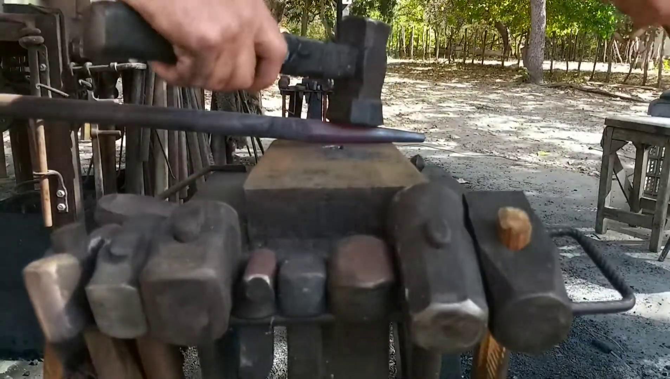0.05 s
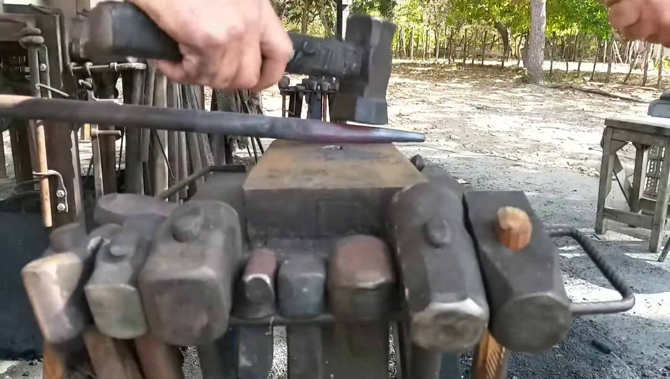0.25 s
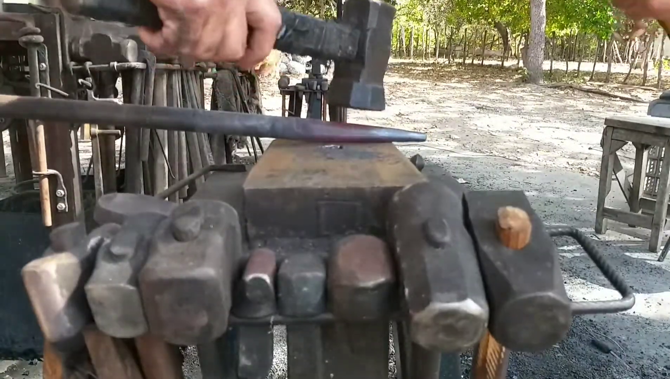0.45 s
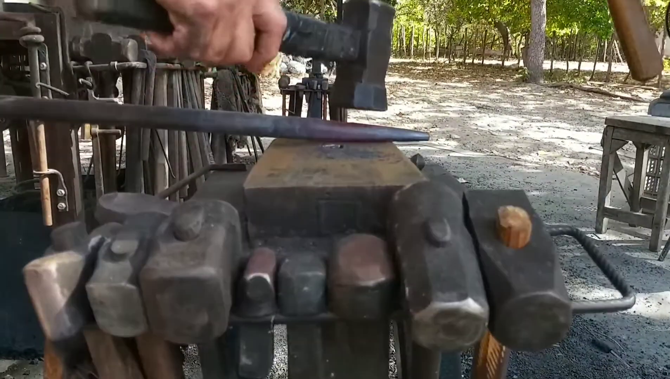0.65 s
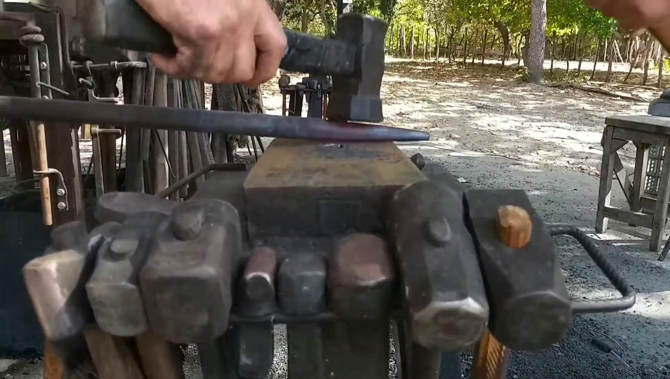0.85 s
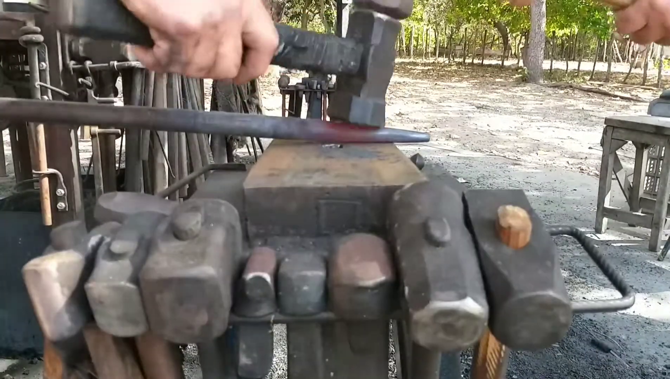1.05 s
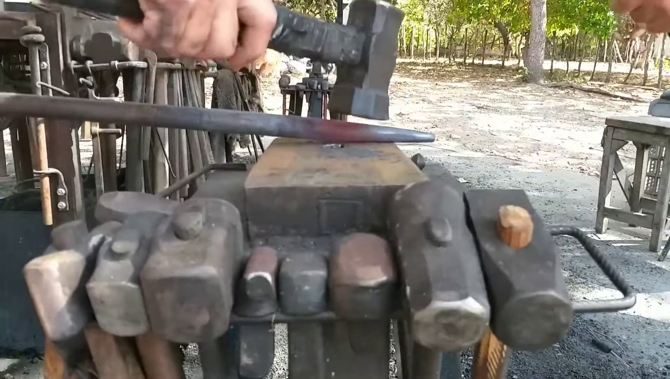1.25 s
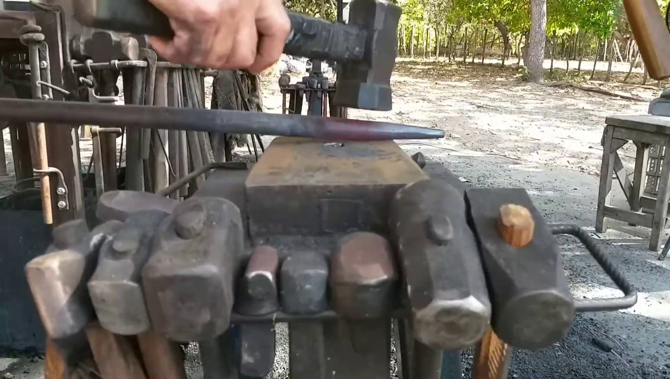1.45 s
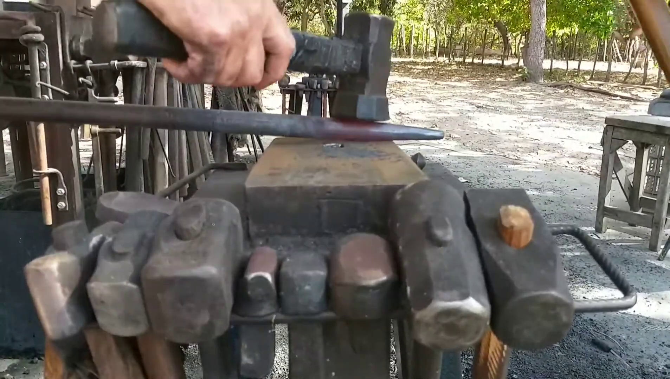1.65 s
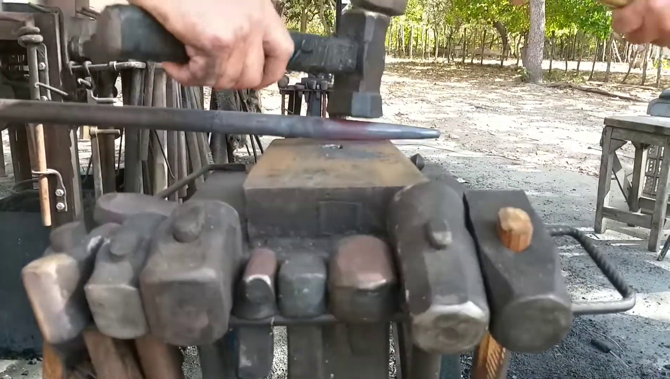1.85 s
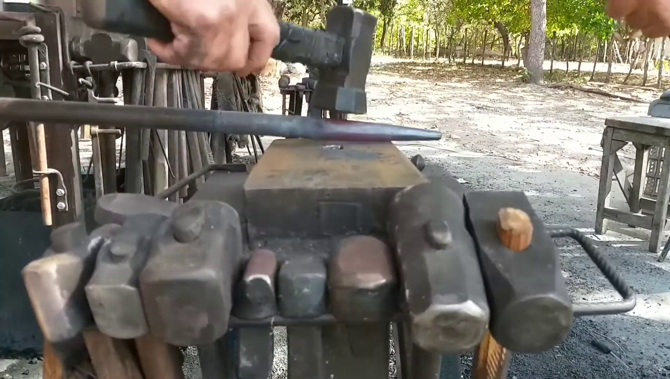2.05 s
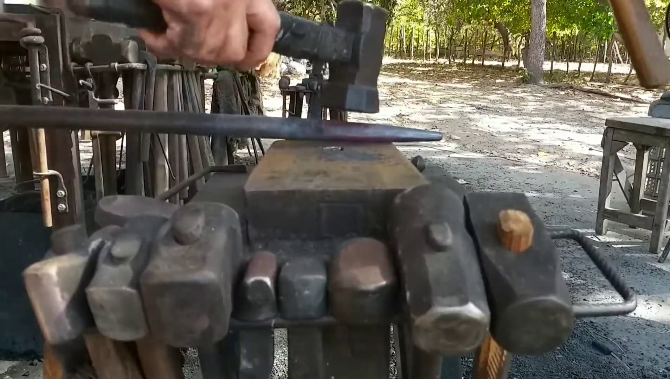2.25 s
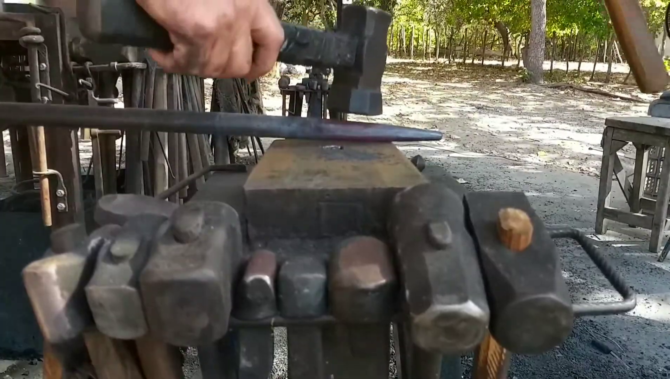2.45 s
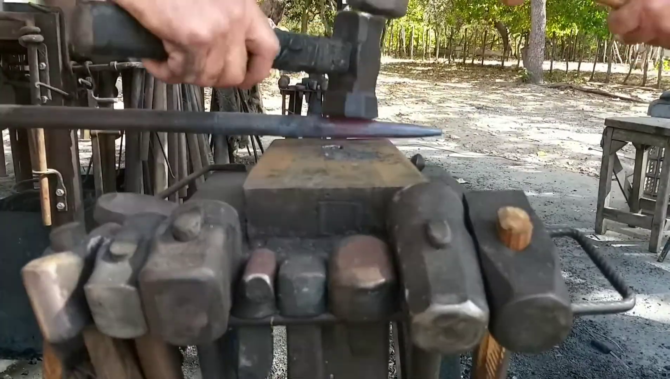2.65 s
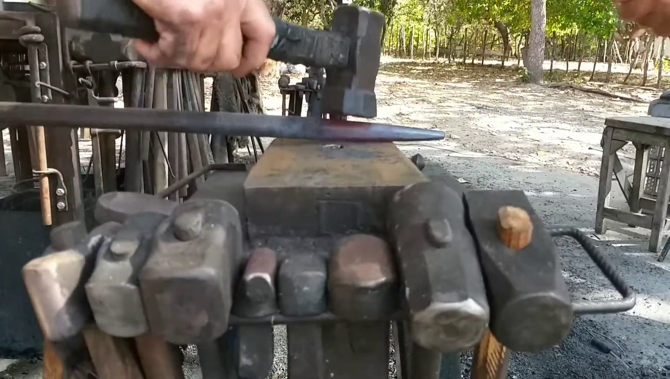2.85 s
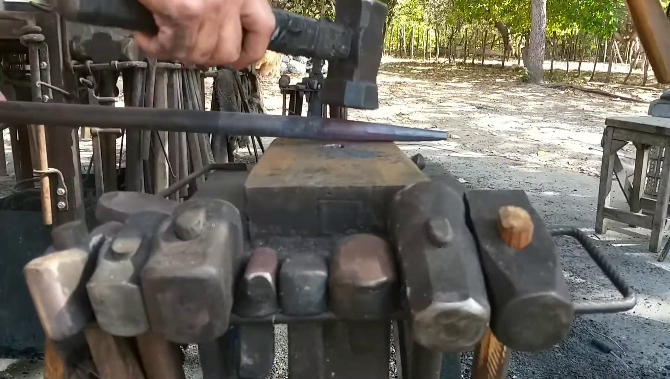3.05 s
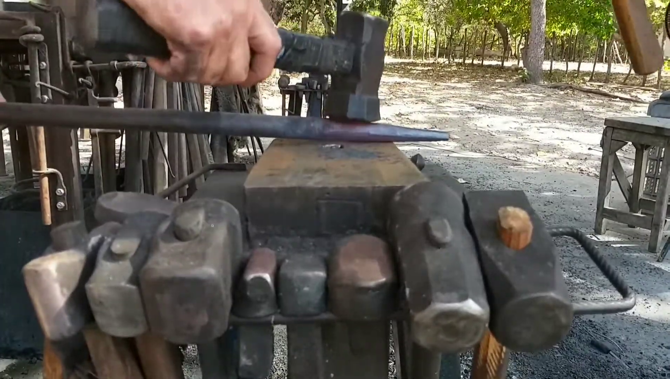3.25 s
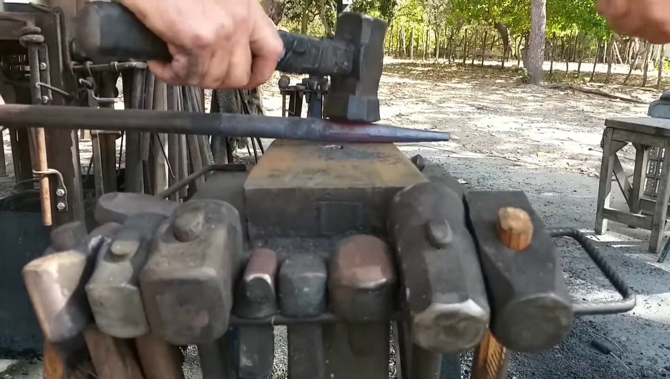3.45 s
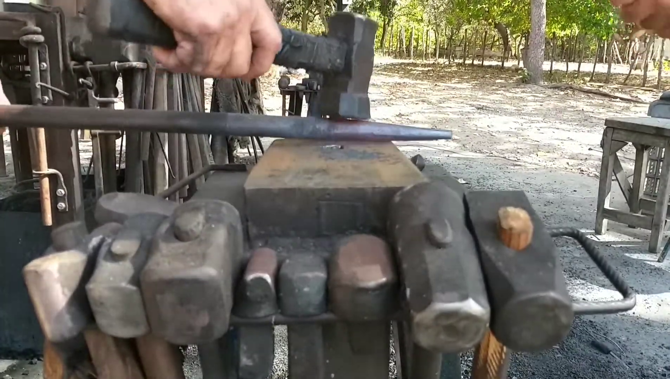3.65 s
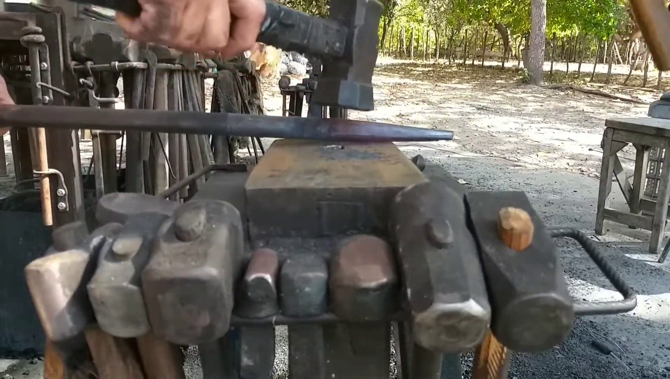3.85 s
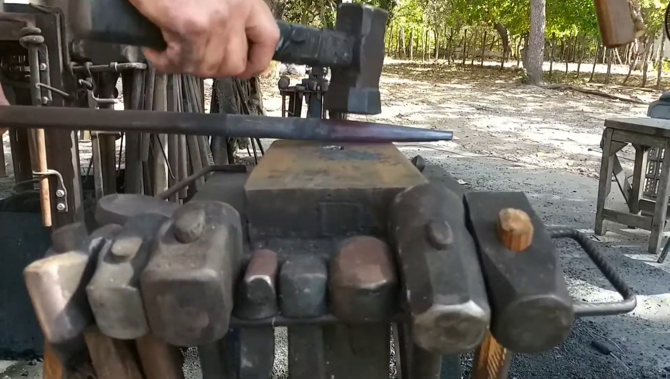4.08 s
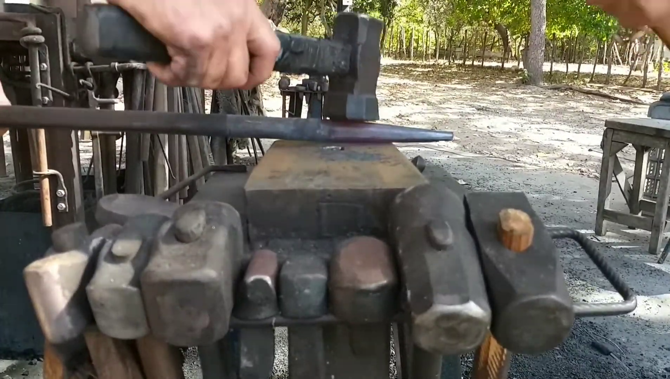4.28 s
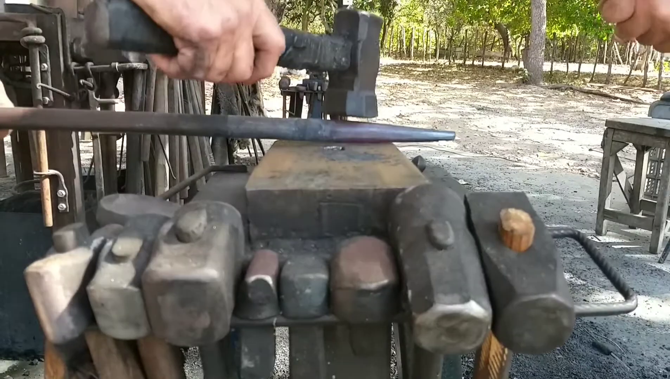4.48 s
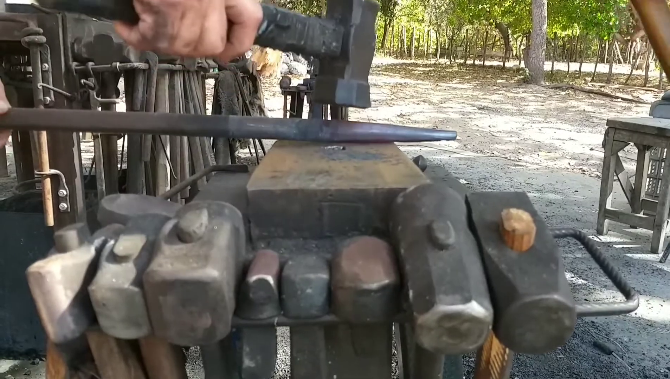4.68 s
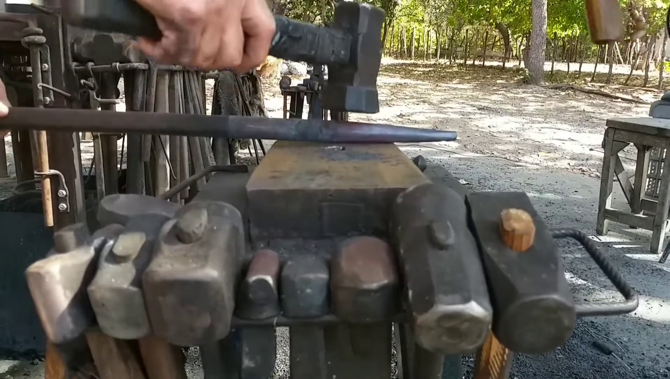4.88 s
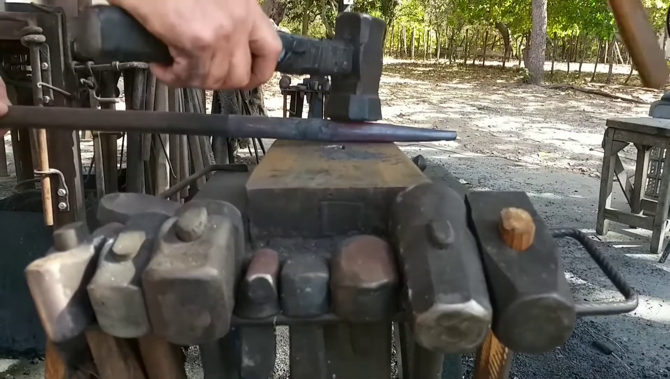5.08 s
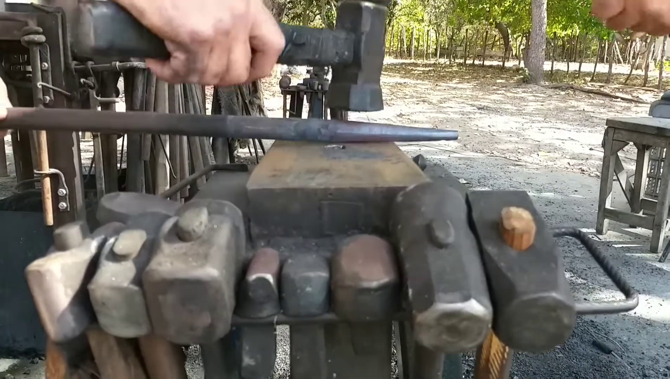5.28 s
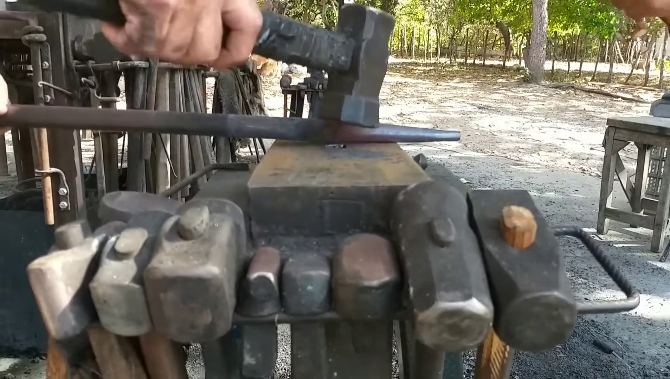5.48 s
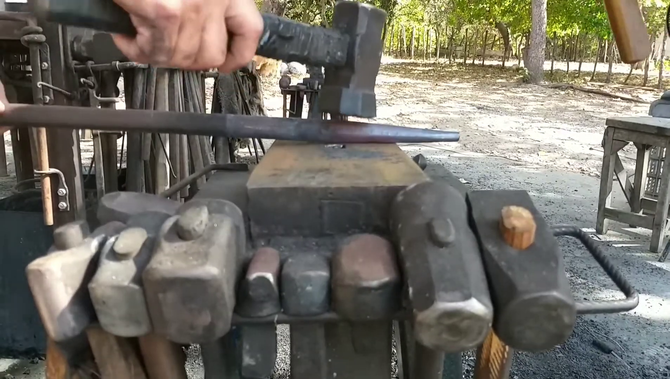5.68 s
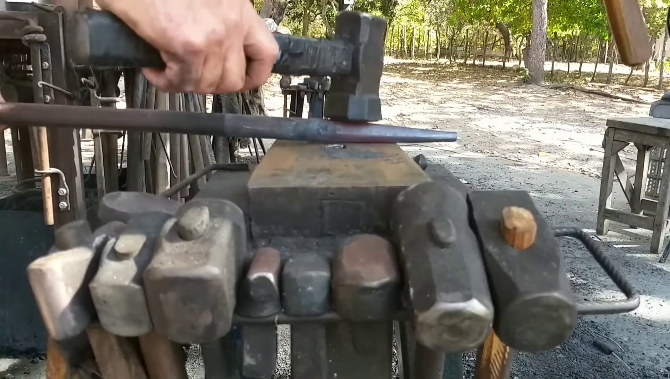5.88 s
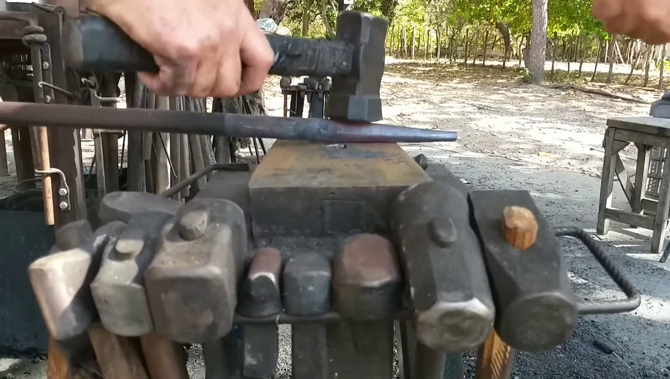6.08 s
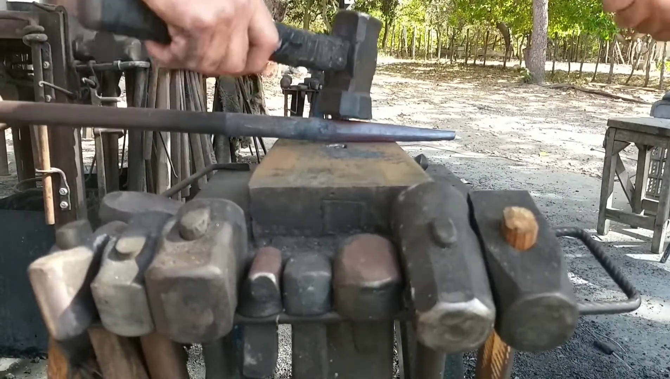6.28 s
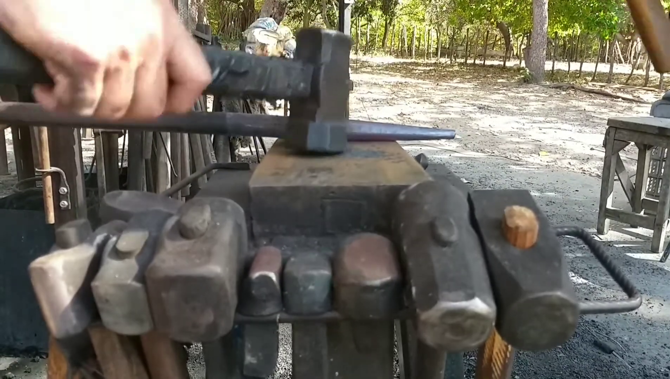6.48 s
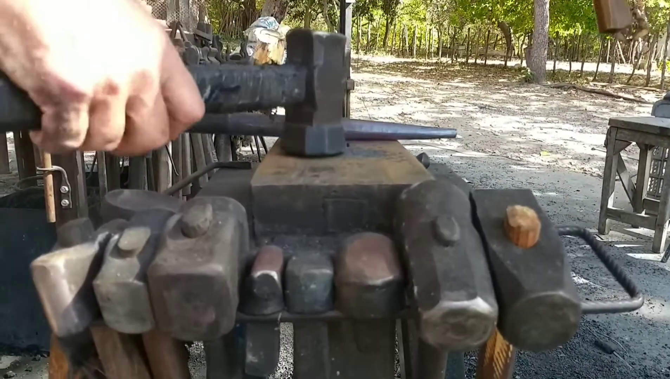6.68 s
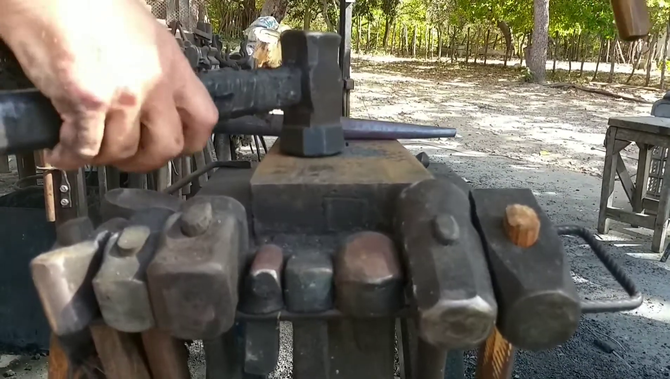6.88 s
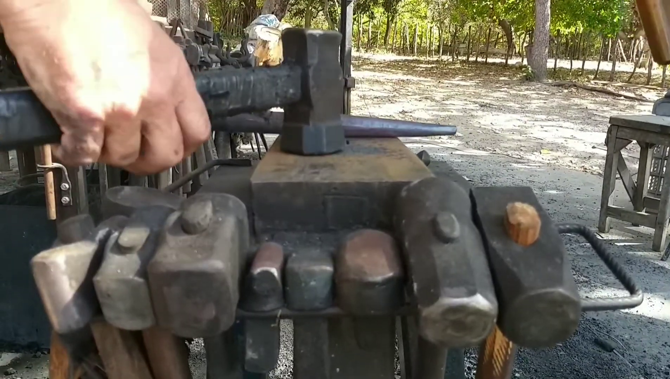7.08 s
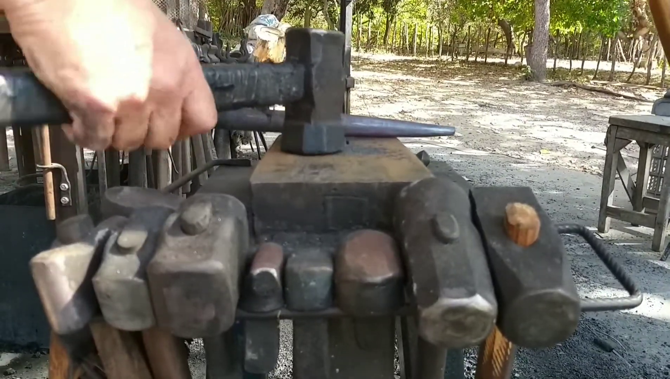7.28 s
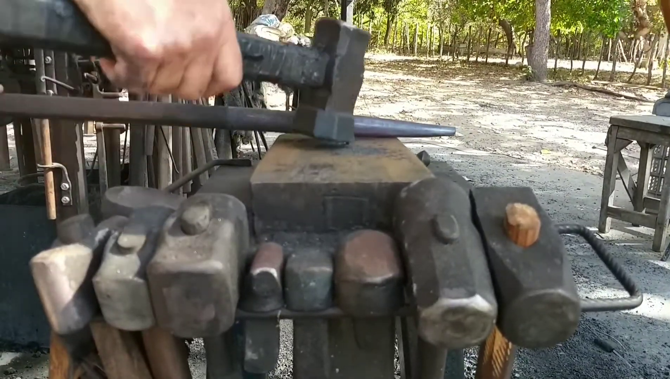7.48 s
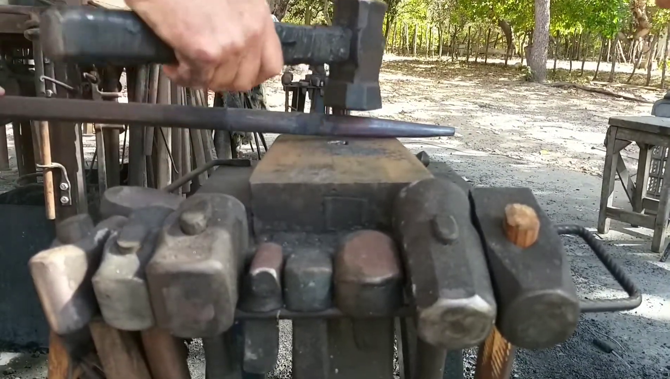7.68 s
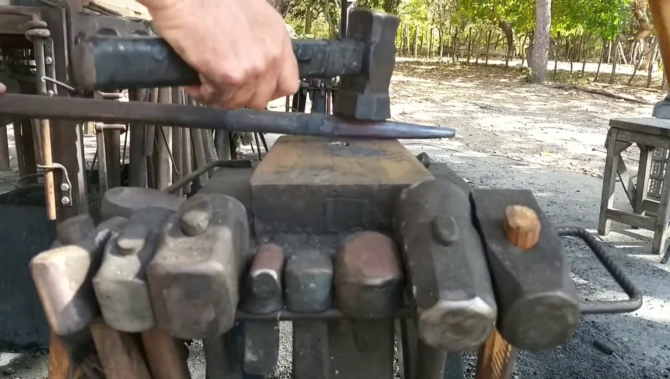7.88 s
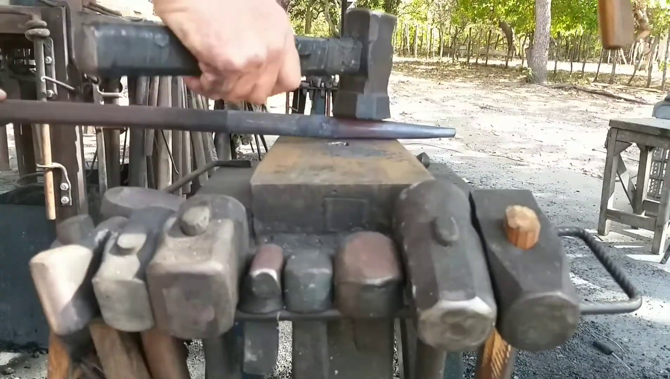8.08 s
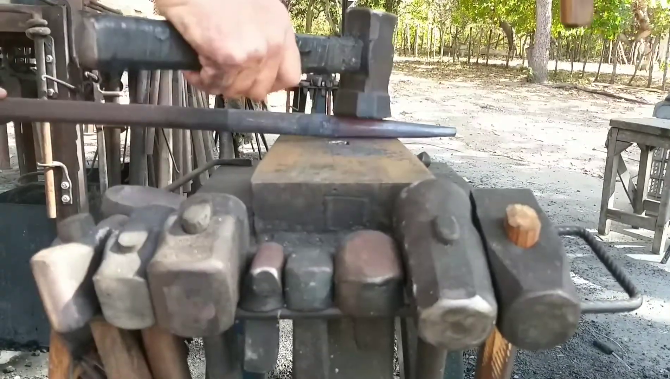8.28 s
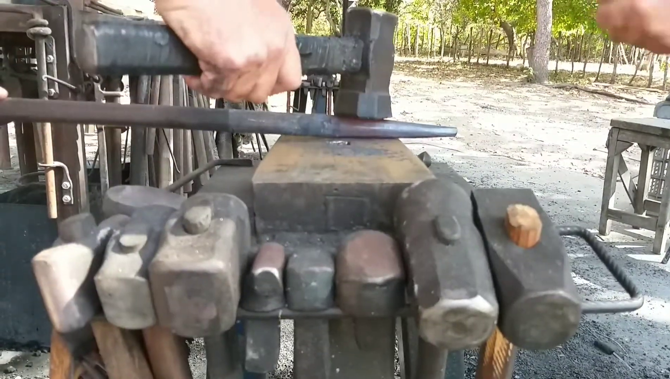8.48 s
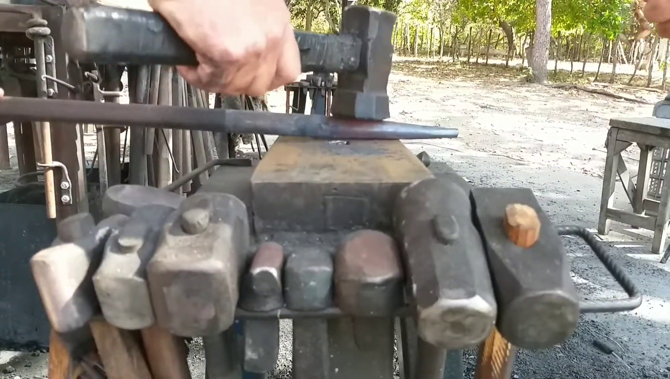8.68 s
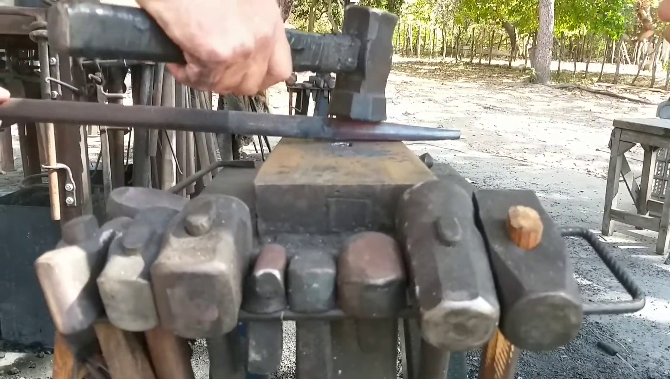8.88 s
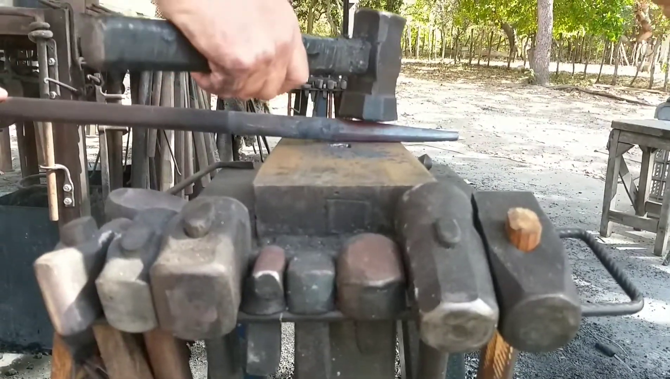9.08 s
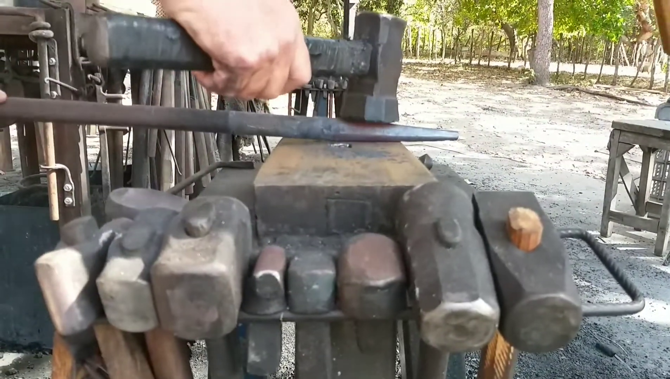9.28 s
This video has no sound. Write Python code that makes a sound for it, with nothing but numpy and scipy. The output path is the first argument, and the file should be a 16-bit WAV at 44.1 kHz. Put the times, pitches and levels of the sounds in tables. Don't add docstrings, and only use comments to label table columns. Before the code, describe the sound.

Eight evenly spaced sledge blows on steel, then a gap and a ninth. Sharp dry cracks, a short thud and dense loose-tool rattle, bright bar ringing cut short by small bounces. Soft taps come between blows. In the gap the hammer is laid down, wind buffets the close microphone, and clear clinks patter just before the end. Open yard, faint hum and airy hiss, hardly any echo.

```python
import sys
import numpy as np
from scipy import signal
from scipy.io import wavfile
from scipy.ndimage import uniform_filter1d

SR = 44100
rng = np.random.default_rng(int(sys.argv[2]) if len(sys.argv) > 2 else 0)


def invert_db(level):
    return 10 ** (np.asarray(level, dtype=float) / 20)


def output_pcm(signal):
    pcm = np.clip(np.atleast_2d(signal).T, -1, 1) * 32767
    wavfile.write(sys.argv[1], SR, np.round(pcm).astype(np.int16))


N = 411894

# [t/s, crack level/dB, long ring level/dB, high ring level/dB, head lifts off after/s]
BLOWS = [
    (0.14, -25, -44, -40, 0.05),
    (0.929, -26, -41, -44, 0.026),
    (1.802, -32, -45.5, -42, 0.033),
    (2.628, -25.5, -48, -36.5, 0.17),
    (3.47, -29.5, -43.5, -38, 0.17),
    (4.345, -26.5, -51.5, -42, 0.06),
    (5.216, -28.5, -51, -42, 0.07),
    (6.094, -28, -48, -43, 0.051),
    (8.482, -27.5, -55, -40, 0.17),
]
# [leaves anvil t/s, flight/s, low modes level/dB, main mode level/dB, next mode level/dB]
THROWS = [
    (0.151, 0.032, -53, -41, -46),
    (0.964, 0.034, -48, -35, -50),
    (1.826, .054, -47, -40, -46),
    (2.639, 0.054, -43, -24.5, -43),
    (3.472, .077, -50, -34, -32),
    (4.368, .037, -50.5, -33, -41),
    (5.229, .037, -47, -37.5, -50),
    (6.118, .045, -45, -32, -58),
    (8.488, .066, -46, -28.5, -46),
]
# [t/s, flight/s,
# knock level/dB, low modes level/dB, main mode level/dB]
TAPS = [(0.799, 0.016, -50, -59.5, -49.5), (1.582, .028, -51, -52, -48.5), (1.61, 0.027, -58, -59.5, -43),
        (2.511, .018, -49, -55.5, -39.5), (3.228, 0.023, -51, -53.5, -52.5), (3.438, 0.015, -58, -70, -72),
        (4.165, 0.022, -51, -56, -51.5), (5.015, 0.029, -50, -49, -47.5), (5.086, 0.022, -57, -73, -73),
        (5.806, 0.023, -53, -51, -46), (7.766, .012, -32, -44, -25.5), (7.787, 0.018, -32, -48, -27),
        (7.804, .016, -33, -42, -28), (7.822, .028, -38, -50, -41), (8.71, .035, -66, -54, -72),
        (9.105, 0.027, -48.5, -50.5, -44)]
# [t/s, flight/s, low modes level/dB, main mode level/dB, next mode level/dB]
REBOUNDS = [
    (0.258, .045, -50, -43, -54),
    (1.895, .028, -49, -46, -54),
    (2.764, .023, -43, -34, -53),
    (3.563, .016, -41, -45, -43),
    (3.588, .011, -47, -31, -50),
    (3.617, .045, -41, -38, -39),
    (4.503, .032, -48, -45, -56),
    (5.266, .06, -39, -43, -40),
    (6.458, .05, -55, -49, -78),
    (6.446, .012, -38, -65, -77),
]
# [t/s, gain/dB, wind level/dB]
RIDE = [(0, -2, -85), (1.5, -1, -82.5), (3, -1.5, -83), (4.8, -2.5, -88.5), (5.7, -1, -73.5),
        (6.1, -1, -72.5), (6.6, -1, -84), (7.3, -0.5, -70), (7.6, 8, -62), (7.85, 13, -59.5),
        (8.2, 10, -59), (8.5, 9.5, -83), (8.75, 4, -72.5), (8.95, 0, -76.5), (9.34, -1.5, -81)]


def unit(x):
    return x / np.sqrt(np.mean(x ** 2) + 1e-20)


def at_hz(points, hz):
    table_hz, values = np.transpose(points)
    return np.interp(np.log(hz), np.log(table_hz), values)


def drift(rate):
    r = np.exp(-80 * np.pi * rate / SR)
    slow = signal.lfilter([1], [1, -2 * r, r * r], rng.standard_normal(N // 40 + 2002))[2000:]
    return np.interp(np.arange(N) / 40, np.arange(len(slow)), unit(slow))


def ring(x, hz, t60):
    r, w = invert_db(-60 / (t60 * SR)), 2 * np.pi * hz / SR
    return signal.lfilter([0, np.sin(w)], [1, -2 * r * np.cos(w), r * r], x + 1e-18)


def clicks(times, sizes):
    out = np.zeros(N)
    np.add.at(out, np.round(np.asarray(times) * SR).astype(int), sizes)
    return out


def band(x, low_hz, high_hz):
    return signal.sosfilt(signal.butter(2, [low_hz, min(high_hz, .45 * SR)], "band", fs=SR, output="sos"), x)


def noise_bands(spectrum, likeness, source):
    edges = 25 * 2 ** np.arange(0, 9.6, .5)
    centres = np.sqrt(edges[1:] * edges[:-1])
    gains = invert_db(at_hz(spectrum, centres)) * np.sqrt(np.diff(edges))
    for k, hz in enumerate(centres):
        mid, side = band(source[k % 2], edges[k], edges[k + 1])
        alike = np.clip(at_hz(likeness, hz), 0, 1)
        both = np.sqrt(1 + alike) * unit(mid) + np.sqrt(1 - alike) * unit(side) * [[1], [-1]]
        yield hz, gains[k] / np.linalg.norm(gains) * unit(both)


def rattle(rate, uneven_db):
    sizes = invert_db(uneven_db * np.minimum(rng.exponential(1, N), 5)) * rng.choice([-1, 1], N)
    return unit(sizes * (rng.random(N) < rate / SR)) + 0.52 * rng.standard_normal(N)


def blows():
    s, _, long_db, high_db, lift = np.transpose(BLOWS)
    gain_db = np.interp(s, *np.transpose(RIDE)[:2])
    clatter_db = -39.5 + 0.26 * gain_db
    held = .053 + .0015 * gain_db
    return np.transpose([s, clatter_db, long_db, high_db, held, lift])


def last_blow():
    rows, t = blows(), np.arange(N) / SR
    k = np.searchsorted(rows[:, 0], t) - 1
    return np.where(k < 0, 9, t - rows[k, 0]), rows[k].T


def air():
    # [f/Hz, level/dB per Hz]
    air_spectrum = [(25, -33), (60, -28), (120, -7.5), (280, -12), (450, -16.5), (800, -19), (2400, -16.5),
                    (3100, -21), (3800, -14), (4600, -24.5), (7500, -17), (10800, -26.5), (12500, -46),
                    (16000, -35)]
    # [f/Hz, likeness 0..1]
    air_likeness = [(60, 1.0), (180, 1.0), (550, 0.99), (1650, 0.96), (4970, 0.95), (15000, 0.096)]
    # [f/Hz, width/Hz, level/dB]
    hum = [(170, 9.3, -78), (590.4, 23, -82.5)]
    bands = noise_bands(air_spectrum, air_likeness, rng.standard_normal((2, 2, N)))
    out = invert_db(-69) * sum(noise * invert_db(1.65 * drift(7.1)) for hz, noise in bands)
    return out + sum(invert_db(db) * unit(ring(rng.standard_normal(N), hz, 1.4 / width)) for hz, width, db in hum)


def wind(wind_db):
    # [t/s, peak level/dB, f/Hz]
    puffs = [(1.429, -52, 118), (1.618, -62, 133), (5.727, -56, 151), (6.448, -46.5, 111),
             (7.299, -46, 180), (7.447, -54, 99.6), (7.617, -38.5, 121), (7.778, -40, 106),
             (7.949, -41, 116), (8.072, -29.5, 228), (8.214, -37.5, 205.2), (8.679, -45, 140),
             (8.899, -45.5, 128.7)]
    lumps = unit(band(rng.standard_normal(N), 46, 250)) * invert_db(wind_db - 1.0 + 5.2 * drift(21))
    return lumps + sum(ring(clicks([s], [invert_db(db)]), hz, 3.6 / hz) for s, db, hz in puffs)


def knocks():
    lead_s = .002
    contacts = [row[:2] for row in BLOWS]
    contacts += [(row[0], -32) for row in THROWS]
    contacts += [(row[0] - lead_s, row[2]) for row in TAPS]
    contacts += [(row[0] - lead_s, -44.5) for row in REBOUNDS[:-1]]
    contacts += [(REBOUNDS[-1][0], -36)]

    grain = unit(band(band(rattle(rate=6000., uneven_db=3.5), 1020, 5260), 450, 6000))
    out = np.zeros(N)
    for s, db in contacts:
        i = int(s * SR)
        t = np.arange(len(out[i:i + 6000])) / SR
        t60 = .04 if db > -31 else .06
        out[i:i + 6000] += invert_db(db - 4 - 60 * t / t60) * grain[i:i + 6000]
    first = clicks([s for s, db in contacts], [invert_db(db - 6) for s, db in contacts])
    out += band(band(first, 2000, 5200), 1300, 5500)
    return np.array([out + 0.044 * np.roll(out, 9), out - 0.097 * np.roll(out, 9)])


def clatter():
    # [f/Hz, level/dB per Hz]
    rack_spectrum = [(40, -20), (150, -3), (600, -8), (1500, -5.5), (2600, -2), (3800, -9), (5500, -11.5),
                     (9000, -3.5), (12000, -13), (15500, -7.5)]
    # [f/Hz, t60/s]
    rack_t60 = [(60, 0.15), (200, 0.33), (500, 0.22), (1100, 0.18), (3700, 0.51), (8000, 0.19),
                (11000, 0.21), (13000, .05), (16000, 0.037)]
    # [f/Hz, likeness 0..1]
    steel_likeness = [(60, 1), (550, 1), (1650, 0.99), (5000, .93), (15000, 0.37)]
    # [f/Hz, level/dB, t60/s]
    tools = [(1526, -7.5, 0.028), (2218, -6.5, 0.076), (2937, -9.5, 0.026), (4140, -13, 0.1),
             (4655, -7, 0.023), (5030, -12, 0.027), (6460, -12.5, 0.065), (6910, -14.5, 0.097),
             (13750, -31, 0.17), (14400, -26, 0.16)]
    # [f/Hz, level/dB, t60/s]
    stand = [(81, -18, 0.14), (198, -27, 0.5), (233.2, -17, 0.39), (329, -17.5, 0.22), (574.5, -11, 0.086)]
    thud_db = 5
    echo_db, echo_t60 = -22.5, 0.9

    age, (_, level_db, _, _, held, _) = last_blow()
    after = np.maximum(age - held, 0)
    source = np.array([[rattle(rate=7000., uneven_db=2.5), rng.standard_normal(N)] for _ in range(2)])
    rack = np.zeros((2, N))
    for hz, noise in noise_bands(rack_spectrum, steel_likeness, source):
        sagging = invert_db(-110 * np.minimum(age, held) * (0.35 + 0.71 * (hz < 7000)))
        dying = sagging * invert_db(-60 * after / at_hz(rack_t60, hz))
        echo = invert_db(echo_db - 60 * age / echo_t60) * (hz < 11000)
        rack += noise * (dying + echo) * invert_db(thud_db * (hz < 700) + 2.2 * drift(25))
    rack *= invert_db(level_db) * np.clip(age / 0.0012, 0, 1)

    shaking = invert_db(level_db - 60 * after / .06) * (age < .5) * unit(rattle(rate=900., uneven_db=2.0))
    rings = sum(invert_db(db - 35 + 1.2 * drift(4.1)) / np.sqrt(t60) * ring(shaking, hz, t60) for hz, db, t60 in tools)

    rows = blows()
    push = clicks(rows[:, 0] + 0.00337, invert_db(rows[:, 1] + thud_db))
    thud = sum(invert_db(db + 1.3 * drift(2.9)) * ring(push, hz, t60) for hz, db, t60 in stand)
    return rack + rings * invert_db([[.7], [-.7]]) + thud


def heads(limiter):
    # [f/Hz, t60/s]
    head_rings = [
        (7992, 0.89),
        (12068, 0.35),
    ]
    rows, (age, row) = np.array(BLOWS), last_blow()
    rings = []
    for (hz, t60), level_db in zip(head_rings, rows[:, 2:4].T):
        hit = clicks(rows[:, 0], invert_db(level_db))
        rings.append(ring(hit, hz, t60) + 0.2 * ring(hit, hz + 22, t60 * 1.17))
    lifted = invert_db(-350 * np.maximum(row[5] - age, 0) + 1.2 * drift(9))
    t = np.arange(N) / SR
    laid_down = (t > 6.43) * (t < rows[-1, 0])
    return rings[0] * lifted * uniform_filter1d(1. - laid_down, size=300) + rings[1] * limiter


def touches():
    # [upper three level/dB, top modes level/dB]
    brightness = [(-48, -40), (-44, -42), (-46, -36.5), (-42, -47), (-37, -56), (-45, -41), (-37, -41),
                  (-41, -52), (-52, -42)]
    pinned_db, chatter_s = (-50.5, -52, -56), .012
    graze_db = (5, -1.5, 2)
    throw_landing_db, tap_landing_db = (-3, -13.5, -8), (-10, -13.5, -7, -6, -6)
    settle_s, settle_loss_db = .024, -4.5
    scatter_db = 2.2
    rows, starts = [], np.sort([row[0] for row in BLOWS + TAPS + REBOUNDS] + [99])

    def bright(s):
        k = np.searchsorted(np.transpose(BLOWS)[0], s) - 1
        fall_db_per_s = [120, 180]
        return np.array(brightness[k]) - np.multiply(fall_db_per_s, s - BLOWS[k][0])

    blow_luck = rng.standard_normal((len(BLOWS), 10, 5))
    for (blow, *_), (leaves, flight, *ring_db), luck in zip(BLOWS, THROWS, blow_luck):
        lands = leaves + flight
        pinned = [(s, pinned_db) for s in np.arange(blow + .001, leaves - chatter_s / 2, chatter_s)[:4]]
        flying = [(leaves, ring_db), (leaves + flight / 2, np.add(ring_db, graze_db))]
        landed_db = np.add(ring_db, throw_landing_db)
        settling = [(lands + k * settle_s, landed_db + k * settle_loss_db) for k in range(4)]
        end = starts[starts > blow][0]
        for (s, db), mix in zip(flying + settling + pinned, luck):
            if s < end:
                share = np.where(leaves <= s < lands, [0, 0, .5, 1, 1], 1)
                rows.append((s, *(np.r_[db, bright(s)] + scatter_db * mix * share)))

    hops = []
    for s, flight, *ring_db in REBOUNDS:
        woken_db = np.add(ring_db[2], (-9, -13))
        hops.append((s, flight, np.r_[ring_db, np.maximum(bright(s), woken_db)]))
    for s, flight, knock_db, low_db, main_db in TAPS:
        hops.append((s, flight, np.r_[low_db, main_db, knock_db - 10, main_db - 18, main_db - 31]))
    for s, flight, db in hops:
        rows.append((s, *db))
        if s + flight < starts[starts > s][0] - .004:
            rows.append((s + flight, *(db + tap_landing_db)))
    return np.array(sorted(rows))


def bar():
    mode_hz = [1190, 1869, 2740, 3657, 4762, 5955, 7255, 8637, 10153, 11710, 13320, 15050]
    # [level in its group/dB, left minus right/dB]
    modes = [(-18.5, 1), (-3.5, 4.5), (-10, 3), (0.44, 2), (-1.2, 2.5), (-7, 4), (-6.5, 2.5), (-4.5, 2.8),
             (-2, -3), (-15, 5), (-16, -10), (-21, 14)]
    mode_group = [0, 0, 0, 1, 2, 3, 3, 3, 4, 4, 4, 4]
    air_t60, held_t60, resting_t60 = 0.55, 0.25, 0.2

    rows, out = touches(), np.zeros((2, N))
    hz, (share_db, pan_db), age = np.array(mode_hz), np.transpose(modes), last_blow()[0]
    touch_luck = rng.standard_normal((len(rows), 2, len(modes)))
    grip = np.array([invert_db(1.5 * drift(50)) for _ in modes])
    phase, before = 0, -99
    for row, gap, (level, new_phase) in zip(rows, np.diff(rows[:, 0], append=99), touch_luck):
        drive_db = row[1:][mode_group]
        phase = np.where(drive_db > before, 9 * new_phase, phase)
        before = drive_db - 1
        i = int(row[0] * SR)
        free, thrown = gap < .09, age[i + 200] < .085
        t60 = resting_t60 if not free else air_t60 if thrown else held_t60
        t = np.arange(int((min(gap, .3)) * SR) + 130)[:N - i] / SR
        span = slice(i, i + len(t))
        fade = np.clip(np.minimum(t, t[-1] - t) * SR / 130, 0, 1)
        bend = (0 if thrown else 3.5) * np.log(grip[:, span])
        level_db = drive_db + share_db + 2.8 * level * (share_db < -1) + 2.5
        gains = invert_db(level_db + np.outer([.5, -.5], pan_db))
        tones = np.sin(2 * np.pi * np.outer(hz, t + i / SR) + phase[:, None] + bend)
        out[:, span] += gains @ (tones * grip[:, span]) * fade * invert_db(-60 * t / t60)
    return out


def sparks():
    # [t/s, peak level/dB, f/Hz]
    cracks = [
        (2.8745, -46, 7990),
        (3.1028, -52.5, 3930),
        (3.12, -53, 3700),
        (7.3456, -50, 8860),
        (7.369, -52, 3880),
        (8.0838, -34, 4030),
        (8.8444, -62, 3960),
    ]
    out = np.zeros(N)
    for (s, db, hz), noise in zip(cracks, rng.standard_normal((len(cracks), 400))):
        i = int(s * SR)
        out[i:i + 400] += invert_db(db + 0.5) * band(noise, 0.7 * hz, 2.9 * hz) * np.exp(-np.arange(400) / 68.0)
    return out


def port(x):
    port_hz, width_hz, boost = 3680, 503, 1.44
    r, w = np.exp(-np.pi * width_hz / SR), 2 * np.pi * port_hz / SR
    return x + boost * signal.lfilter([(1 - r * r) / 2, 0, (r * r - 1) / 2], [1, -2 * r * np.cos(w), r * r], x)


def scene():
    s, gain_db, wind_db = np.transpose(RIDE)
    t = np.arange(N) / SR
    age, row = last_blow()
    held = row[4]
    limiter = invert_db(-700 * np.maximum(held - .025 - age, 0))
    outdoors = air() * invert_db(np.interp(t, s, gain_db)) + wind(np.interp(t, s, wind_db))
    outdoors = signal.sosfilt(signal.butter(2, 87, "high", fs=SR, output="sos"), outdoors)
    broad = clatter() + knocks() + outdoors * limiter + sparks()
    dull = signal.sosfilt(signal.cheby2(8, 40, 13000, fs=SR, output="sos"), broad)
    shut = uniform_filter1d(1. * (age > held + .02) * (age < .19), size=500)
    return port(broad + shut * (dull - broad)) + bar() + heads(limiter) * invert_db([[.3], [-.3]])


def top_cut(x):
    return signal.sosfilt(signal.butter(12, 16830, fs=SR, output="sos"), x)


def record(dry):
    ceiling, top_hz = .09, 16150
    rounded = ceiling * np.tanh(dry / ceiling)
    mix = signal.sosfilt(signal.cheby2(10, 60, 1.04 * top_hz, fs=SR, output="sos"), rounded)
    return top_cut(mix)


dry = scene()
out = record(dry)
output_pcm(out)
```